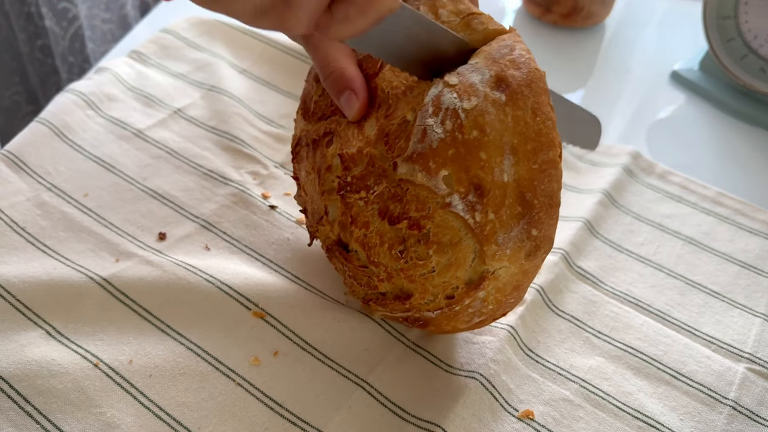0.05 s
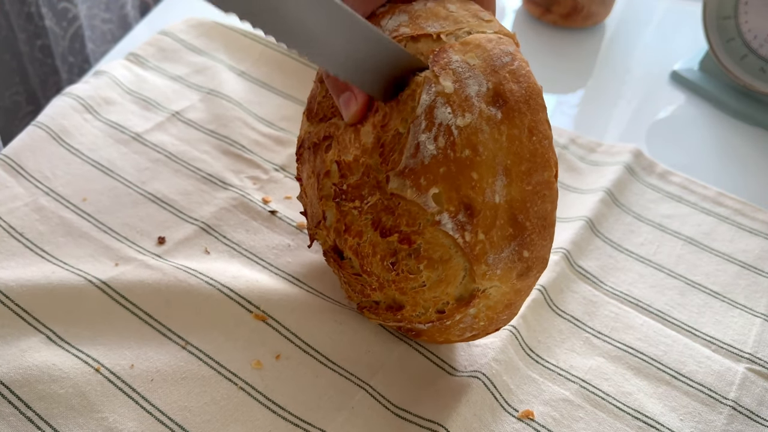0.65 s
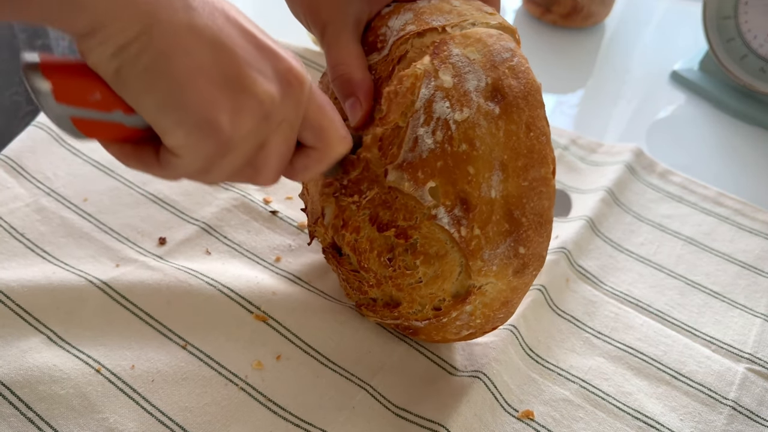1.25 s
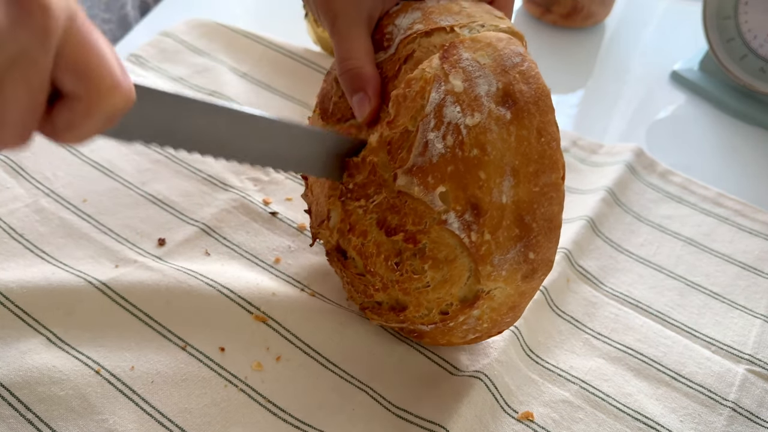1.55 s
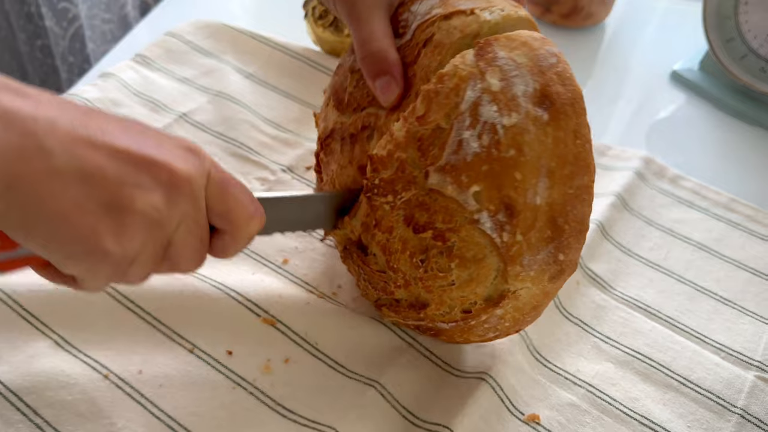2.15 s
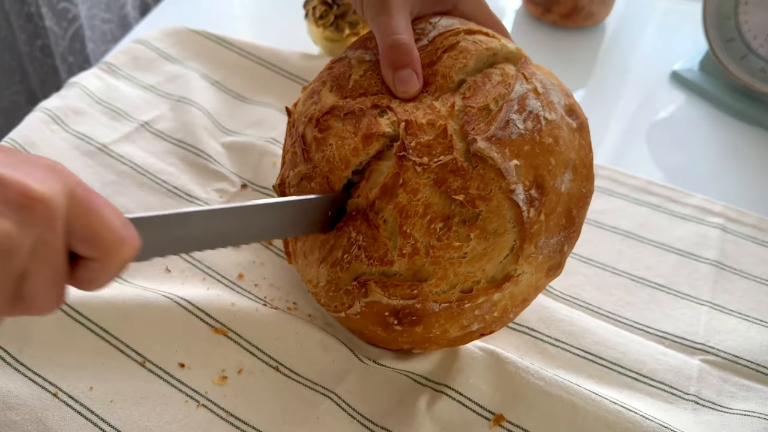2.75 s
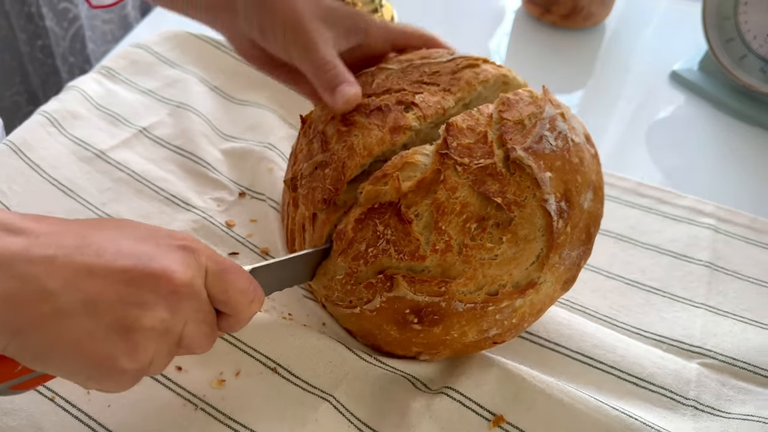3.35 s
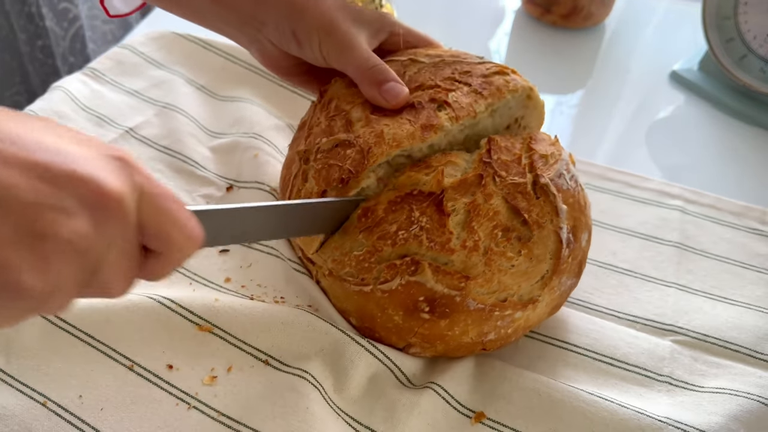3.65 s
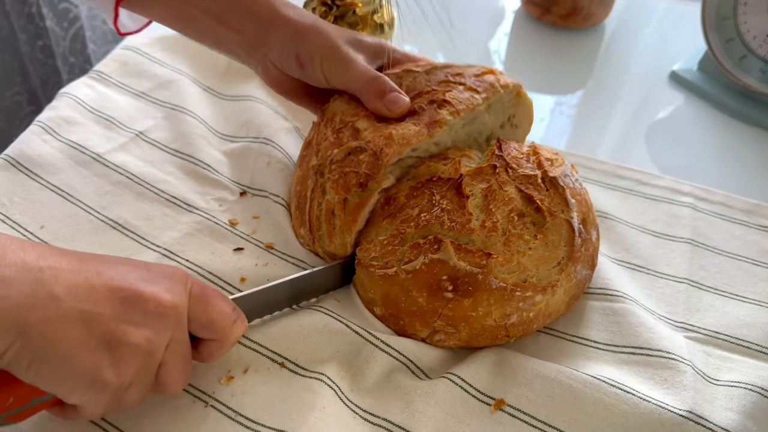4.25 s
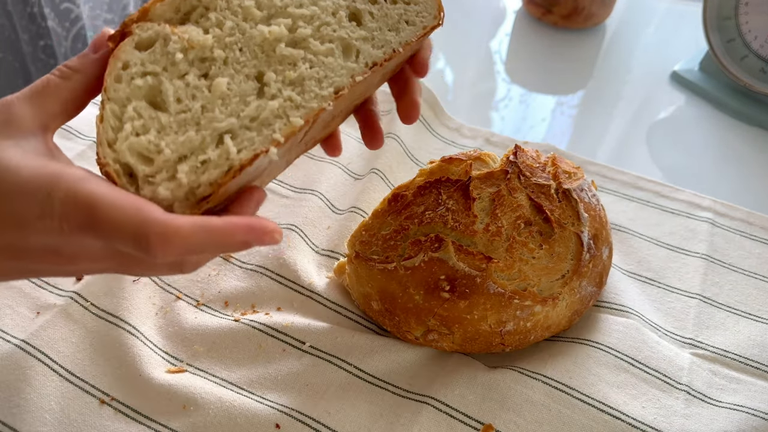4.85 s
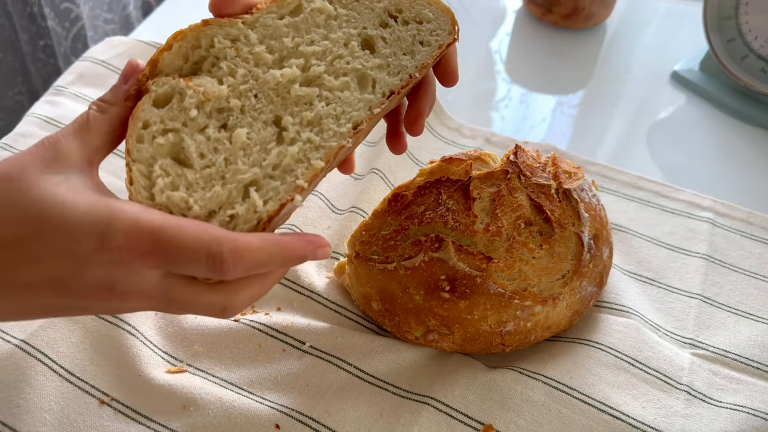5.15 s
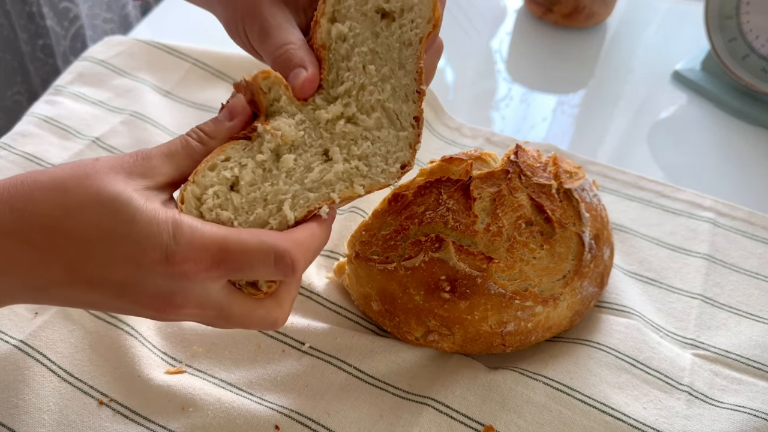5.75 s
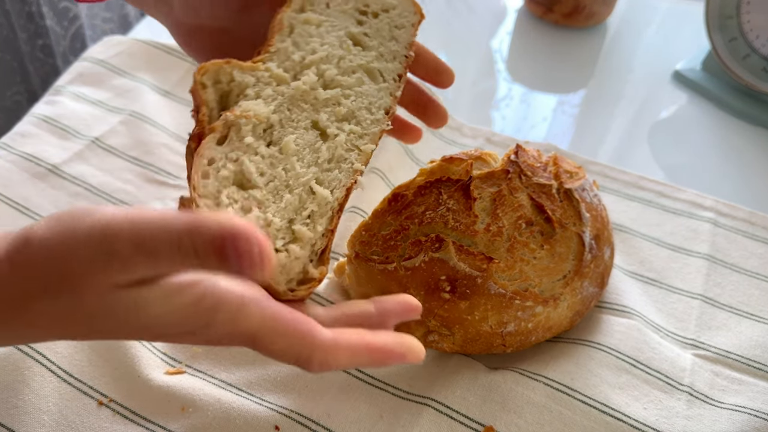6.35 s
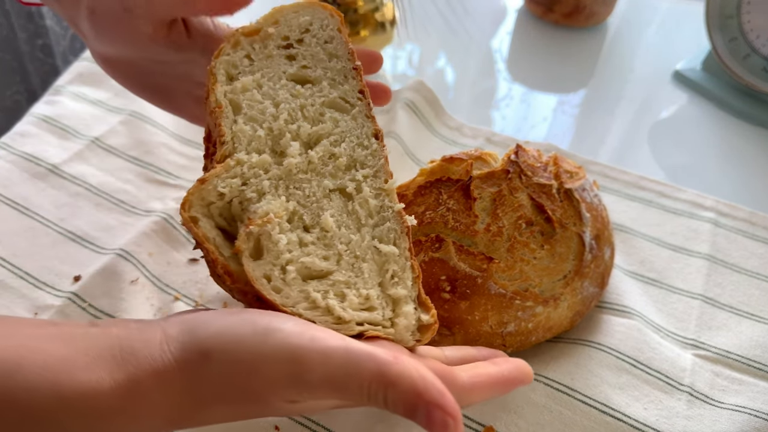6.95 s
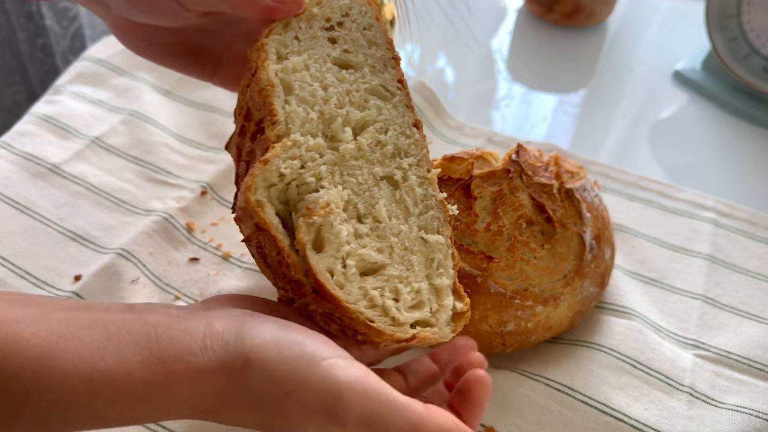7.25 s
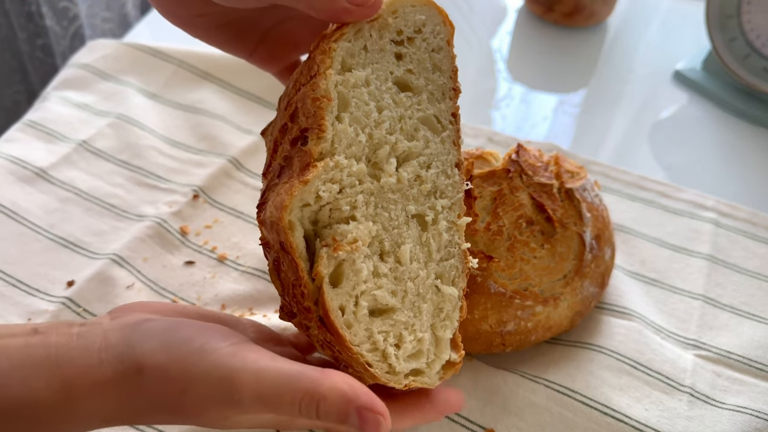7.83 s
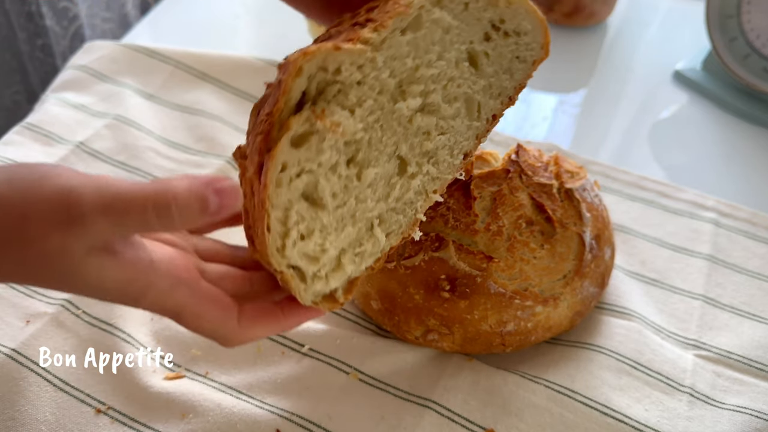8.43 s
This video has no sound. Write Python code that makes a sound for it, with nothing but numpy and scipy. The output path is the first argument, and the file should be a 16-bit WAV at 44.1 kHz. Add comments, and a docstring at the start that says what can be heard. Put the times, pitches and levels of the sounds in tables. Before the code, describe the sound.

Close, crunchy sawing opens the sound as a bread knife pushes and rasps back through a hard crust, breaking off flakes with loud cracks and low knocks. Halfway through, the knife stops and quieter handling takes over: fingers bend the cut half with crisp little splinters, then palms slide faintly over the crust. A low, steady kitchen room tone lies underneath.

```python
"""Crackling, rasping strokes: a serrated knife saws through a crusty loaf on a cloth-covered table.
The teeth break the crust into tiny grains and loud snaps, which ring the blade and thud in the loaf.
Then one half is lifted, squeezed until its crust splinters, and turned over with a soft, dry rub.
Behind it all sits a quiet kitchen: a faint tail off the walls and a low bed of room tone."""
import sys
import numpy as np
from scipy import signal
from scipy.fft import rfft, irfft
from scipy.io import wavfile
from scipy.ndimage import uniform_filter1d

SR = 44100
rng = np.random.default_rng(int(sys.argv[2]) if len(sys.argv) > 2 else 0)


def unload_wav(signal):
    """Save mono or channel-first audio to the path in sys.argv[1] as 16-bit WAV at rate SR, clipped to [-1, 1]."""
    wavfile.write(
        sys.argv[1],
        SR,
        np.round(np.clip(np.atleast_2d(signal).T, -1, 1) * 32767).astype(np.int16),
    )


N = 378819

# Gestures, each layer trimmed later in the mix: start_s, length_s, build_db, crunch_db, crisp_db, thud_db
PUSHES = [(0.065, 0.145, 0.5, -19, -16.5, -16), (0.23, 0.054, 10, -31.5, -40, -30),
          (0.71, 0.36, -5.5, -21.5, -21, -25.5), (0.925, 0.085, -9, -23, -23, -23.5),
          (1.035, 0.14, -14, -18.5, -17.5, -16), (1.64, 0.21, -1.5, -20.5, -19, -21.5),
          (1.9, 0.11, 6.5, -16, -13.5, -19), (2.08, 0.23, 14, -44, -56, -32),
          (2.6, 0.06, 6, -21.5, -24.5, -26.5), (2.675, 0.26, 12, -16.5, -16, -15.5),
          (3.0, 0.05, 2, -23.5, -21.5, -32), (3.14, 0.24, 20, -37.5, -36.5, -34.5),
          (3.885, 0.13, 5, -19, -21, -19), (4.02, 0.2, 5, -27, -32.5, -27.5)]   # the knife drives forward and breaks the crust
PULLS = [(0.0, 0.023, 2, -28, -19, -27), (0.395, 0.13, -4, -19, -14.5, -17.5),
         (1.322, 0.14, -2, -21.5, -11.5, -18.5), (2.29, 0.16, 9, -31.5, -20.5, -23),
         (3.565, 0.024, -13, -35, -33.5, -24.5), (3.64, 0.059, 0.5, -21, -18, -24)]   # the knife draws back and rasps
SQUEEZES = [(4.405, 0.032, 0.5, -28.5, -25.5, -23.5), (5.215, 0.043, 0, -34.5, -38, -42),
            (5.305, 0.027, -1, -39, -31, -49), (5.355, 0.17, -6, -37.5, -34, -48),
            (5.548, 0.16, -7, -30, -25, -42), (5.73, 0.2, 7.5, -30, -23.5, -41.5),
            (5.96, 0.1, -4, -42.5, -43, -56), (6.075, 0.1, -2.5, -29.5, -31, -37),
            (6.21, 0.15, 3, -43, -39.5, -53)]   # the hands bend the half loaf
RUBS = [(4.14, 0.11, -3, -34, -38, -37.5), (4.265, 0.065, 1.5, -32.5, -32.5, -33),
        (4.35, 0.044, -5, -29, -33, -27.5), (4.45, 0.17, 0.5, -36, -34.5, -27.5),
        (4.63, 0.12, 2.5, -28, -31.5, -27), (4.83, 0.048, -0.5, -33.5, -31, -38),
        (4.9, 0.15, -7, -49.5, -44, -62), (6.4, 0.42, 5, -55, -49.5, -61),
        (7.115, 0.046, -2, -34.5, -40.5, -35), (7.262, 0.027, 2, -50, -58, -26),
        (7.31, 0.13, 0, -39, -44.5, -56), (7.43, 0.04, 3, -33.5, -35, -39), (7.5, 0.23, -6, -42, -49, -52),
        (7.793, 0.026, -3, -37, -40, -31.5), (7.995, 0.094, -8, -40.5, -63, -38),
        (8.12, 0.28, 0.5, -41.5, -46, -45.5), (8.42, 0.29, 8, -57, -49.5, -52)]   # palms and cloth slide over the crust
# Accents on the strokes: start_s, length_s, level_db
CAVE_INS = [(0.053, 0.0062, -18), (0.265, 0.0031, -22), (0.701, 0.017, -19.5), (0.773, 0.0052, -16),
            (0.8, 0.0046, -11.5), (0.926, 0.015, -13.5), (1.697, 0.0076, -13.5), (1.765, 0.007, -10),
            (2.415, 0.023, -18), (2.613, 0.013, -25.5), (2.675, 0.049, -15), (3.359, 0.013, -17.5),
            (3.544, 0.0042, -20), (3.912, 0.0042, -14.5), (3.955, 0.041, -11.5)]   # a patch of crust collapses under the teeth
ZINGS = [(0.14, 0.044, -7), (1.1, 0.043, -11.5), (2.42, 0.012, -8.5)]   # the free end of the blade sings out
# One-shot hits: start_s, level_db, pitch_hz
SNAPS = [(0.052, 3.5, 4060), (0.112, 11.5, 1520), (0.265, -3.5, 4900), (0.65, -4.5, 1410), (0.7, 0, 6000),
         (0.772, 7.5, 4600), (0.8, 8, 4370), (0.836, 6.5, 1820), (0.924, -6, 1800), (0.948, 0, 2500),
         (1.003, 7, 1800), (1.03, 21.5, 4000), (1.103, 4, 2970), (1.142, -5, 2880), (1.245, -10.5, 9000),
         (1.278, -5, 1820), (1.636, 4, 10300), (1.699, 10, 2880), (1.841, 7.5, 5230), (1.891, 2, 5660),
         (2.611, 5, 2290), (2.657, 0, 3150), (2.678, 18, 2480), (3.156, -11, 2090), (3.358, -9, 1200),
         (3.544, -13, 4170), (3.856, -12.5, 3980), (3.884, -5, 1150), (3.912, 3.5, 6400), (3.934, 3, 5230),
         (3.954, 1, 1080), (4.125, -12.5, 2270), (4.158, -4.5, 1600), (4.196, -10.5, 1610),
         (4.628, -1.5, 2030), (5.11, -27, 1430), (5.215, -13, 4830), (5.508, -5, 4520), (5.549, 2.5, 5700),
         (5.571, -6, 2520), (5.736, -7.5, 3300), (5.788, -1, 3460), (5.887, 3, 9800), (5.943, -4, 13500),
         (5.994, -8.5, 10500), (6.114, -9, 4140), (6.139, -6.5, 1400), (6.306, -19, 4670),
         (6.664, -22, 9620), (6.776, -14, 1770), (6.925, -19.5, 1610), (7.059, -24, 2160),
         (7.108, -16.5, 1420), (7.795, -9, 1960), (7.976, -24, 1390), (8.345, -26, 3560)]   # large flakes of crust break off
THUDS_AND_POPS = [(0.107, -5, 228), (0.409, -11, 210), (0.469, -15, 129), (0.776, -4.5, 218),
                  (1.056, -9, 256), (1.126, -20, 92.5), (1.651, -5, 219), (2.33, -18, 166),
                  (2.421, -10.5, 305), (2.463, -13, 115), (2.487, -15, 58), (2.946, -8, 222),
                  (3.316, -20, 175), (3.358, -11.5, 630), (3.966, 0, 1010), (4.726, -22, 146),
                  (4.772, -24, 66), (6.115, -23.5, 257), (6.139, -10, 1390), (6.141, -24, 255),
                  (7.135, -23, 267), (7.16, -24, 249), (7.257, -23, 430), (7.276, -19.5, 270),
                  (8.04, -28, 236)]   # dull thuds of the loaf, plus a few hollow pops of cracking crust
# Resonant modes: pitch_hz, width_hz, gain_db
BLADE_MODES = [(1410, 43, -6), (3060, 150, 0.5), (4140, 127, 4.5), (4530, 390, -7.5), (4900, 250, -1),
               (5530, 330, -6.5), (6730, 61, -4.5), (7990, 58, -2), (9680, 63, -5.5), (9400, 47, -9.5),
               (10400, 150, -4), (10560, 50, -6), (11400, 49, -14), (13200, 140, -11.5), (13500, 160, -8),
               (15400, 130, -35)]   # steel, damped by the bread
LOAF_MODES = [(48.3, 15, -40), (98, 12, -12), (136.3, 19, -4.5), (197.8, 45, 0.5), (245.2, 13.4, 3.5),
              (342, 25, -12), (453.7, 4.3, -4.5), (769, 87, -17), (1010, 40, -17)]   # the loaf on the table
# EQ curves: frequency_hz, gain_db
CUT_CRUNCH_EQ = [(190, -18), (330, 2), (1030, -3.5), (1210, -4.5), (1840, 0), (2630, -3), (3030, -2),
                 (3800, -3), (4940, -9), (8360, -120)]   # midrange grains under the knife
CUT_CRISP_EQ = [(1940, -51), (3300, 5), (4420, -4), (4920, 5.5), (7490, -5.5), (9450, -1), (12400, -6),
                (15200, -2), (16200, -19.5)]   # bright splinters under the knife
HAND_CRUNCH_EQ = [(200, -2), (340, 0.5), (620, -2.5), (1000, -0.5), (1500, 1.5), (2500, -3), (4000, -9),
                  (8000, -36), (16000, -59)]   # midrange grains under the fingers
HAND_CRISP_EQ = [(1500, -32.5), (3000, -0.5), (4500, 1), (7400, -2.5), (10200, -0.5), (11800, -4.5),
                 (15000, -2), (17000, -6)]   # bright splinters under the fingers
ROOM_TONE_EQ = [(24, -62), (40, -3), (81, 4), (180, 3.5), (896, -11.5), (1440, -4), (1850, -11), (3560, -8),
                (5870, -14), (9690, -5), (11600, -25), (14800, -24), (16000, -19)]   # the kitchen's air
# Crossfade from dull rubbing (0) to bright bending (1): time_s, bending_share
BENDING = [(4.2, 0.1), (4.6, 1), (6.2, 0.94), (6.8, 0.67), (7.2, 0.1), (8.1, 0.05), (8.5, 0.55)]

CUT_THROUGH_S = 4.15
STROKE_SHAPE = dict(attack_s=0.057, release_s=0.076, arch_db=1.5)   # a stroke is fastest in its middle
HAND_SHAPE = dict(attack_s=0.037, release_s=0.081, arch_db=2)   # pressure peaks in the middle
PUSH_SPREAD_DB, PULL_SPREAD_DB, SQUEEZE_SPREAD_DB, RUB_SPREAD_DB = 4, 0.9, 4.5, 2.5   # of grain sizes
PUSH_RING_DB, PULL_RING_DB = -5, 5   # steel against splinters
DRAG_DB, HOLD_DB = -35.5, -58.5   # floors under the gestures: the blade drags, the fingers never rest
CONTROL_S = np.arange(0, N / SR + .002, .001)   # time grid of the envelopes


def sawing(crunch_db, crisp_db, thud_db, spread_db, ring_db):
    """The teeth break the crust; the same breaks shake the blade and the loaf."""
    breaks = fractures(per_s=3500, spread_db=spread_db)
    crunch = grains(breaks, CUT_CRUNCH_EQ, relative_width=0.52, rub_db=-16, window_s=0.055)
    crunch = from_db(crunch_db - 1.74) * crunch
    crisp = grains(breaks, CUT_CRISP_EQ, relative_width=0.19, rub_db=-9, window_s=0.0336)
    blade = blade_ring(breaks, detune=0.0055, swell_db=14)
    ring = from_db(ring_db)
    treble = from_db(crisp_db - 1) * (crisp + ring * blade) / np.hypot(1, ring)   # equal-power blend
    bite = tooth_snags(per_s=70, t60_s=0.015, depth=0.36 * spread_db)
    thud = from_db(thud_db - 0.6) * evened(body(breaks, LOAF_MODES), window_s=0.049)
    return bite * (crunch + treble) + thud


def knife_envelopes():
    """Pushes crunch coarsely, pulls rasp and ring: crunch, treble, thud, grain spread and ring in dB."""
    push = gestures(PUSHES, **STROKE_SHAPE) + from_db(DRAG_DB) ** 2
    push = push + accents(CAVE_INS, attack_s=0.0047, release_s=0.013)
    pull = gestures(PULLS, **STROKE_SHAPE)
    crunch, treble, thud = push + pull
    splinters = push[1] / (1 + from_db(PUSH_RING_DB) ** 2) + pull[1] / (1 + from_db(PULL_RING_DB) ** 2)
    spread_db = PUSH_SPREAD_DB + (PULL_SPREAD_DB - PUSH_SPREAD_DB) * pull[1] / treble
    treble = treble + accents(ZINGS, attack_s=0.0075, release_s=0.018)
    ring_db = to_db(treble / splinters - 1)   # all treble beyond the splinters is steel
    curves = [to_db(crunch), to_db(treble), to_db(thud), spread_db, ring_db]
    return automation(np.transpose([CONTROL_S, *curves]))


def fractures(per_s, spread_db):
    """The crust fails in tiny random clicks: many small, a few large."""
    at = np.flatnonzero(rng.random(N) < per_s / SR)
    size, polarity = rng.random((N // 4, 2))[:len(at)].T
    breaks = np.zeros(N)
    breaks[at] = from_db(-spread_db[at] * np.log(size + .005)) * np.sign(polarity - .5)
    return breaks


def grains(breaks, eq, relative_width, rub_db, window_s):
    """Each break rings a flake at one of eight pitches for a few cycles, over smooth friction."""
    pitches = np.geomspace(eq[1][0], min(eq[-2][0], SR / 3), num=8)
    dealt = rng.integers(0, len(pitches), N)
    flakes = sum(resonance(breaks * (dealt == k), hz, hz * relative_width)
                 for k, hz in enumerate(pitches))
    crackle = evened(rms_one(flakes) + rms_one(breaks), window_s)
    friction = from_db(rub_db) * rng.standard_normal(N)
    return evened(equalised(crackle + friction, eq), window_s)


def tooth_snags(per_s, t60_s, depth):
    """Teeth snag at uneven intervals; each release is a quick jump in gain. Mean power stays one."""
    snags = rng.exponential(1, N) * (rng.random(N) < per_s / SR)
    bursts = signal.lfilter([1], [1, -from_db(-60 / (t60_s * SR))], snags + 1e-18)
    return evened(1 + depth * np.tanh(bursts), window_s=0.13)


def blade_ring(breaks, detune, swell_db):
    """The bread grips the blade at a moving point, so groups of modes swell, fade and shift a little."""
    n, out = np.arange(N), 0
    for k in range(3):
        warp = np.cumsum(detune * drift(per_s=22))
        ring = body(breaks, BLADE_MODES[k::3]) * from_db(swell_db * drift(per_s=28))
        out = out + np.interp(n + warp - uniform_filter1d(warp, SR // 5), n, ring)
    return evened(out, window_s=0.028)


def crust_snaps(flakes, tick_db, crumbs_db, crumbs_t60_s, delay_s, gain_db):
    """A flake gives way with one sharp pulse and sheds a short spray of crumbs."""
    t = np.arange(SR // 20) / SR
    sprays = rng.standard_normal((len(flakes), len(t)))
    out = np.zeros(N + len(t))
    for (start_s, db, hz), spray in zip(flakes, sprays):
        force = from_db(crumbs_db - 60 * t / crumbs_t60_s) * spray
        force[0] = 1
        drive = (8000 / hz) ** 0.47   # large, low flakes are driven harder
        flake = drive * resonance(force, hz, width_hz=0.25 * hz + 600)
        crack = flake + from_db(tick_db) * resonance(force, hz=4670, width_hz=14000)
        at = int(np.clip((start_s + delay_s) * SR, 0, N - 1))
        out[at:at + len(t)] += from_db(db + gain_db) * crack / np.abs(crack).max()
    return out[:N]


def small_flakes(crisp_db, spread_db, count, scatter_db, low_hz, high_hz):
    """Stray flakes pop off, louder under hard, coarse work: rows of start_s, level_db, pitch_hz."""
    when, size, pitch = rng.random((count, 3)).T
    at = ((np.arange(count) + when) * N / count).astype(int)
    lift_db = 1.5 + 2.96 * spread_db[at]
    level_db = crisp_db[at] + lift_db + scatter_db * (2 * size - 1)
    return np.transpose([at / SR, level_db, low_hz * (high_hz / low_hz) ** pitch])


def thuds_and_pops(sag, rise_cycles, longest_rise_s):
    """Dull loaf thuds and hollow crust pops swell and die in a few cycles, sagging in pitch."""
    t = np.arange(SR // 4) / SR
    out = np.zeros(N + len(t))
    for start_s, db, hz in THUDS_AND_POPS:
        age = t / min(rise_cycles / hz, longest_rise_s)
        glide_hz = hz * (1 + sag * (np.exp(-age / 2) - .5))
        phase = 2 * np.pi * np.cumsum(glide_hz) / SR
        at = int(np.clip(start_s * SR, 0, N - 1))
        out[at:at + len(t)] += from_db(db) * age * np.exp(1 - age) * np.sin(phase)
    return out[:N]


def handling(crunch_db, crisp_db, thud_db, spread_db):
    """Fingers bend the crust until it splinters, or just rub it, which is duller."""
    breaks = fractures(per_s=1900, spread_db=spread_db)
    crunch = grains(breaks, HAND_CRUNCH_EQ, relative_width=0.58, rub_db=-2, window_s=0.054)
    crunch = from_db(crunch_db - 2.37) * crunch
    crisp = grains(breaks, HAND_CRISP_EQ, relative_width=0.27, rub_db=-6.5, window_s=0.11)
    crisp = from_db(crisp_db + 0.8) * crisp
    rubbed = equalised(crisp, [(10000, 0), (11500, -4)])
    bending, = automation(BENDING)
    thud = from_db(thud_db - 3.5) * evened(body(breaks, LOAF_MODES), window_s=0.047)
    return crunch + bending * crisp + (1 - bending) * rubbed + thud


def hand_envelopes():
    """Squeezes splinter the crust, rubs hiss: crunch, crisp, thud and grain spread in dB."""
    squeeze = gestures(SQUEEZES, **HAND_SHAPE)
    total = squeeze + gestures(RUBS, **HAND_SHAPE) + from_db(HOLD_DB) ** 2
    spread_db = RUB_SPREAD_DB + (SQUEEZE_SPREAD_DB - RUB_SPREAD_DB) * squeeze[1] / total[1]
    return automation(np.transpose([CONTROL_S, *to_db(total), spread_db]))


def kitchen_reverb(x, t60_s, wall_hz):
    """A short, dull tail from the nearby walls."""
    t = np.arange(SR // 2) / SR
    tail = rng.standard_normal(len(t)) * from_db(-60 * t / t60_s) * (t > .003)
    tail = signal.sosfilt(signal.butter(1, wall_hz, fs=SR, output="sos"), tail)
    return signal.fftconvolve(x, tail / np.linalg.norm(tail))[:N]


def room_tone(level_db):
    """The kitchen's air: a steady, dark bed of noise."""
    return from_db(level_db) * rms_one(equalised(rng.standard_normal(N), ROOM_TONE_EQ))


def effort(start_s, length_s, attack_s, release_s, build_db=0, arch_db=0):
    """Power of one move: it holds with a tilt and an arch; attack and release are times for 20 dB."""
    t = CONTROL_S - start_s
    position = np.clip(t / length_s, 0, 1) - .5
    fade = np.maximum(-t, 0) / attack_s + np.maximum(t - length_s, 0) / release_s
    return from_db(build_db * position + arch_db * (.5 - (2 * position) ** 2) - 20 * fade) ** 2


def gestures(rows, attack_s, release_s, arch_db):
    """Power envelopes of one kind of gesture: crunch [0], crisp [1] and thud [2]."""
    return sum(from_db(levels_db)[:, None] ** 2
               * effort(start_s, length_s, attack_s, release_s, build_db, arch_db)
               for start_s, length_s, build_db, *levels_db in rows)


def accents(rows, attack_s, release_s):
    """Power envelope of short, abrupt events."""
    return sum(from_db(db) ** 2 * effort(start_s, length_s, attack_s, release_s)
               for start_s, length_s, db in rows)


def automation(rows):
    """Breakpoints (time_s, values...) to one curve per value, at every sample."""
    times_s, *columns = np.transpose(rows)
    return [np.interp(np.arange(N) / SR, times_s, column) for column in columns]


def drift(per_s):
    """A wandering modulator that glides between random values."""
    return np.interp(np.arange(N) * per_s / SR, np.arange(2000), rng.standard_normal(2000))


def body(x, modes):
    """An object's modes, ringing in parallel."""
    return sum(from_db(db) * resonance(x, hz, width_hz) for hz, width_hz, db in modes)


def resonance(x, hz, width_hz):
    """Two-pole resonator with unity gain at its peak."""
    r = np.exp(-np.pi * width_hz / SR)
    feedback = [1, -2 * r * np.cos(2 * np.pi * hz / SR), r * r]
    return signal.lfilter(np.array([1, 0, -1]) * (1 - r * r) / 2, feedback, x + 1e-18)


def equalised(x, eq):
    """Minimum-phase EQ: nothing rings ahead of a transient."""
    size = 8192
    hz, db = np.transpose(eq)
    grid_hz = np.maximum(np.fft.rfftfreq(size, 1 / SR), 1)
    gain = from_db(np.interp(np.log(grid_hz), np.log(hz), db))
    cepstrum = irfft(np.log(gain))
    cepstrum[1:size // 2] *= 2
    cepstrum[size // 2 + 1:] = 0
    return signal.oaconvolve(x, irfft(np.exp(rfft(cepstrum))))[:N]


def evened(x, window_s):
    """Leveller: holds the short-term power at one."""
    power = np.abs(uniform_filter1d(x ** 2, int(window_s * SR)))
    return x / np.sqrt(power + 1e-12)


def rms_one(x):
    """Scale to unit power."""
    return x / np.sqrt(np.mean(x ** 2) + 1e-20)


def from_db(db):
    """Decibels to gain."""
    return 10 ** (np.asarray(db) / 20)


def to_db(power):
    """Power to decibels."""
    return 10 * np.log10(power + 1e-12)


def scene():
    """The mono mix: sawing crossfades to handling once the loaf is cut through."""
    knife, hands = knife_envelopes(), hand_envelopes()
    cutting, = automation([(CUT_THROUGH_S - .05, 1), (CUT_THROUGH_S + .05, 0)])
    _, crisp_db, _, spread_db = [cutting * a + (1 - cutting) * b for a, b in zip(knife, hands)]
    strays = small_flakes(crisp_db, spread_db, count=110, scatter_db=4, low_hz=1290, high_hz=6900)
    cracks = crust_snaps(np.vstack([SNAPS, strays]), tick_db=-5, crumbs_db=-12.5, crumbs_t60_s=0.011,
                         delay_s=0.001, gain_db=1.5)
    # cracks under the knife also kick the blade and the loaf
    blade_kicks = from_db(-1.5) * body(cracks * cutting, BLADE_MODES)
    loaf_kicks = from_db(0.5) * body(np.abs(cracks) * cutting, LOAF_MODES)
    texture = cutting * sawing(*knife) + (1 - cutting) * handling(*hands)
    punch = thuds_and_pops(sag=0.45, rise_cycles=1.57, longest_rise_s=0.0097)
    bread = texture + cracks + blade_kicks + loaf_kicks + punch
    air = room_tone(level_db=-51)
    reverb = from_db(-17) * kitchen_reverb(bread, t60_s=0.29, wall_hz=5900)
    return (bread + reverb + air)[None]


def record(dry):
    """The microphone drops the deep bass and overloads on the loudest cracks; the top is cut."""
    thinned = signal.sosfilt(signal.butter(4, 38, "high", fs=SR, output="sos"), dry)
    clipped = np.clip(thinned, -1, 1)
    return signal.sosfilt(signal.ellip(10, .1, 70, 16000, fs=SR, output="sos"), clipped)


dry = scene()
out = record(dry)
unload_wav(out)
```